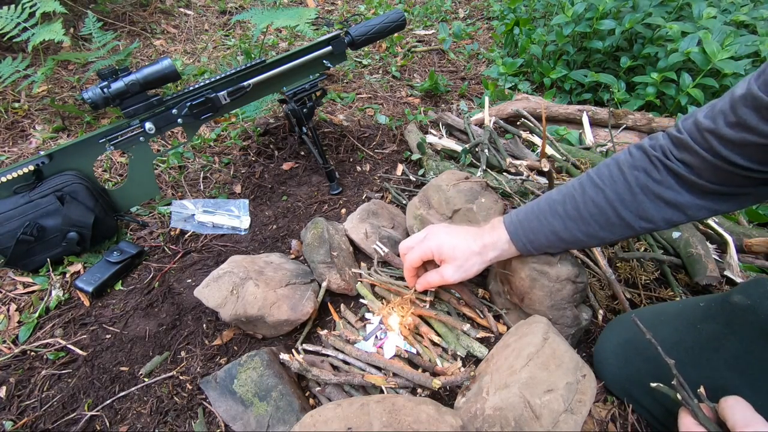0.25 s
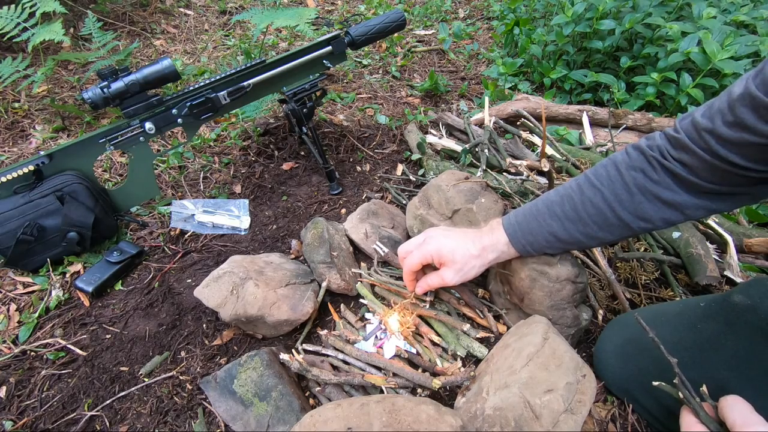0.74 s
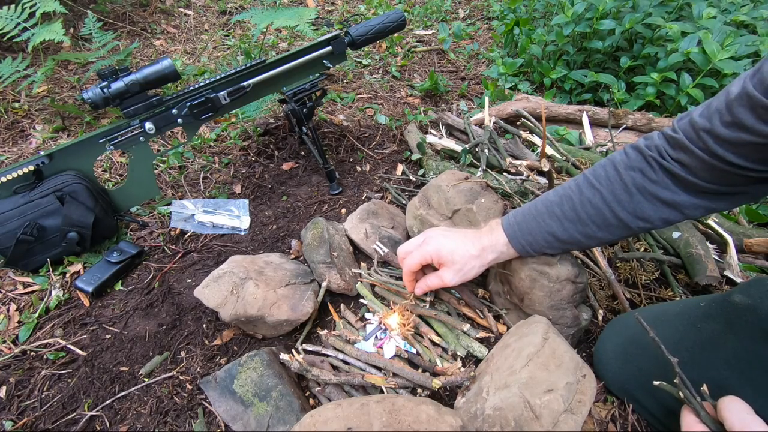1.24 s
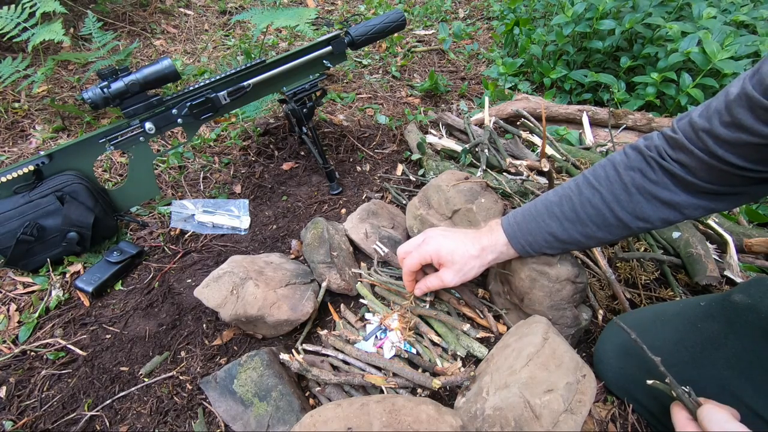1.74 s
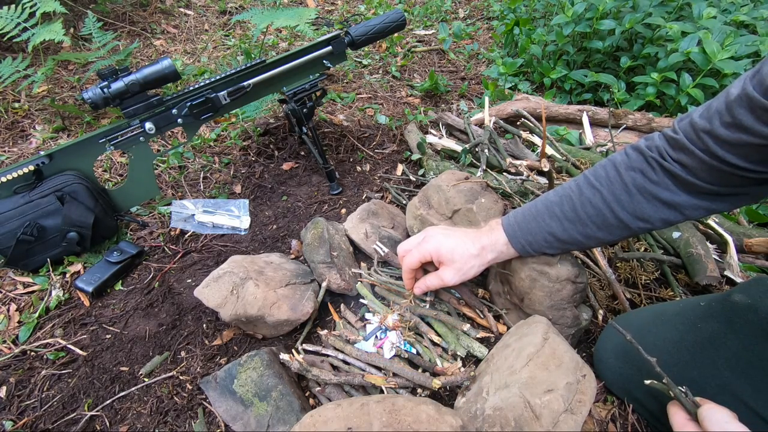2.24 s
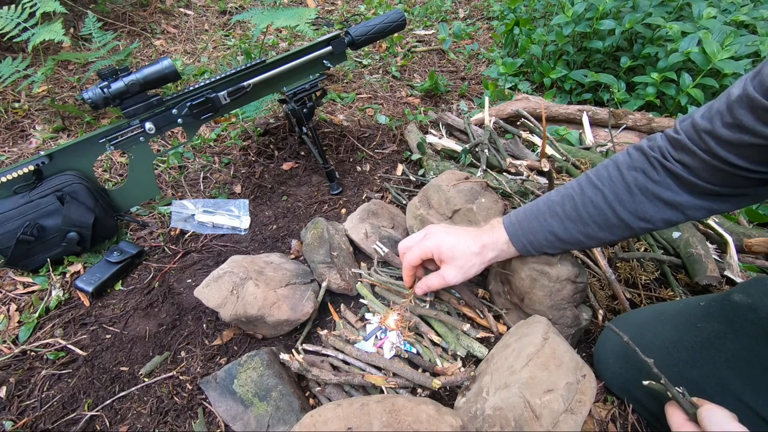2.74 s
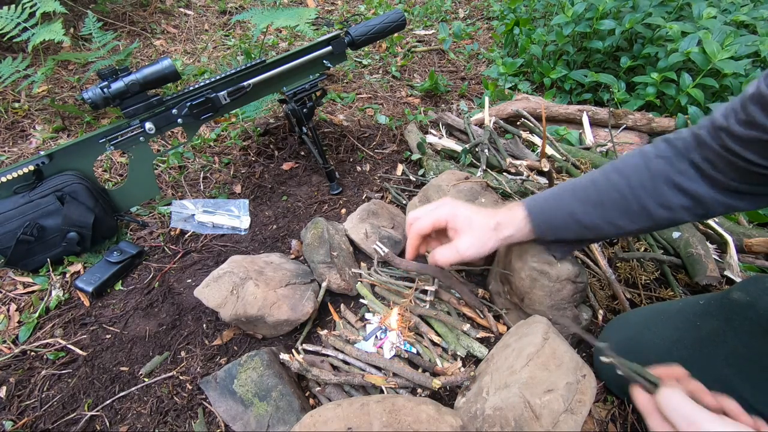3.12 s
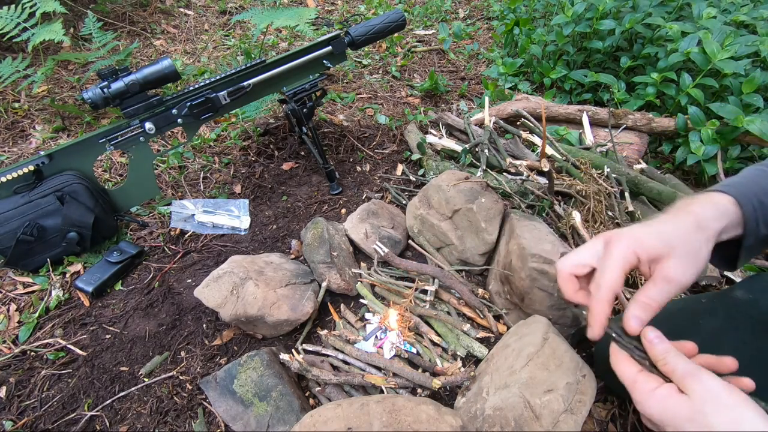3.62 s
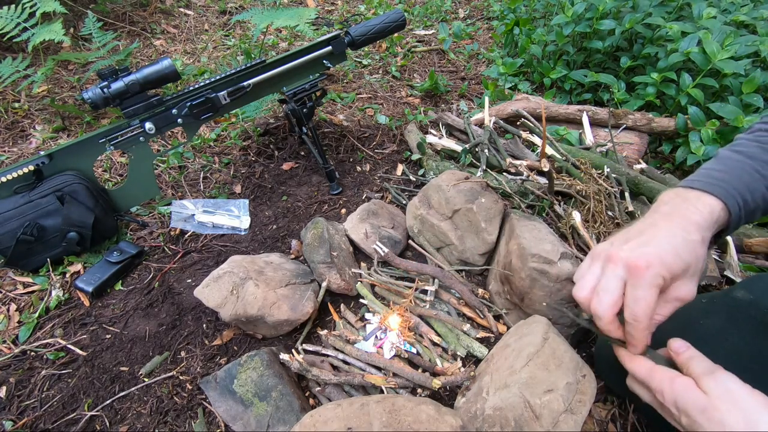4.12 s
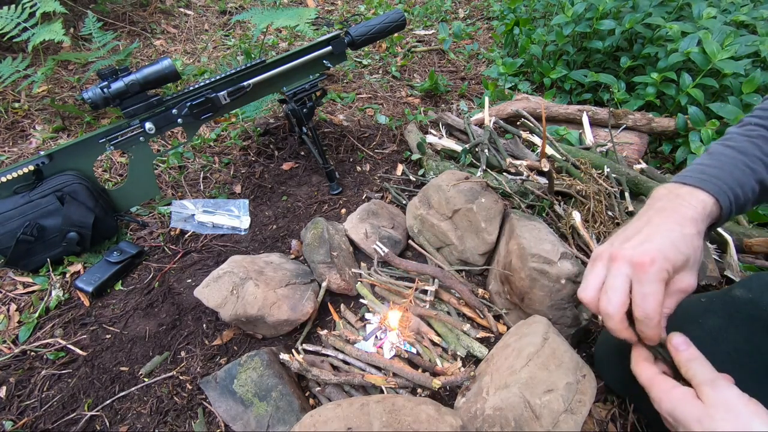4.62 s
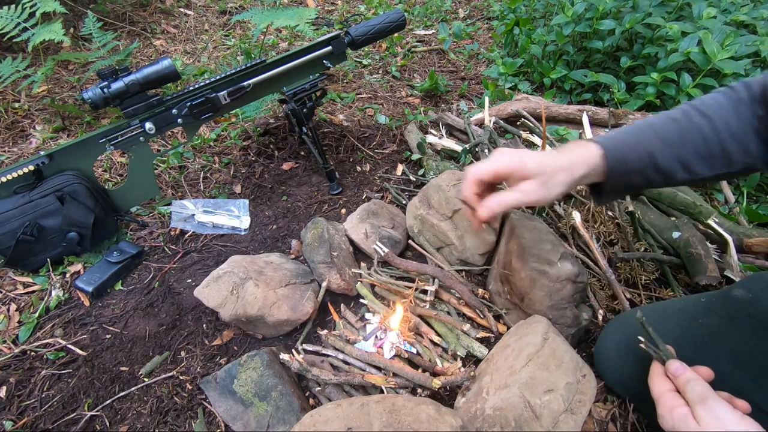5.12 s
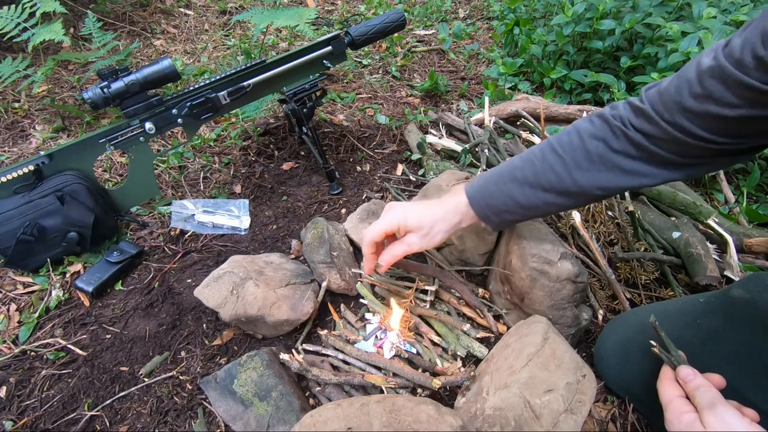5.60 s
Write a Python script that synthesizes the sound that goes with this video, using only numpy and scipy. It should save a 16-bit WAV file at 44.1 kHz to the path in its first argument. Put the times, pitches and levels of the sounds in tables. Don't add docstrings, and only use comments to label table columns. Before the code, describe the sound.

Beside a little stone-ringed camp fire, sharp dry snaps with short woody thumps stand out over very quiet woodland air, ending just after two seconds. Then hands lightly rustle and tick through twigs while wood settles and wind pushes low against the close, almost mono microphone. Soft flame flutters continue, and distant birds give thin whistles and rising buzzy calls, echoing through the trees.

```python
import sys
import numpy as np
from scipy import signal
from scipy.fft import rfft, irfft
from scipy.io import wavfile
from scipy.ndimage import uniform_filter1d

SR = 44100
rng = np.random.default_rng(int(sys.argv[2]) if len(sys.argv) > 2 else 0)


def master(y):
    cut = np.clip(np.atleast_2d(y).T, -1, 1)
    pcm = np.round(cut * 32767)
    wavfile.write(sys.argv[1], SR, pcm.astype(np.int16))


def to_linear_factor(level_db):
    exponent = np.asarray(level_db, float) / 20
    return 10 ** exponent


N = 258426


def level(x, db):
    return x * to_linear_factor(db) / np.sqrt(np.mean(x ** 2))


def band(x, hz, width_hz):
    edges_hz = [max(hz - width_hz / 2, hz / 4), min(hz + width_hz / 2, 0.45 * SR)]
    return signal.sosfilt(signal.butter(1, edges_hz, "bandpass", fs=SR, output="sos"), x)


def add(out, start_s, x):
    i = int(start_s * SR)
    out[i:i + len(x)] += x[:N - i]


def fade(t, t60_s):
    return (t >= 0) * np.exp(-np.log(1000) * np.maximum(t, 0) / t60_s)


def walk(rate_hz):
    hold = int(SR / rate_hz)
    steps = np.repeat(rng.standard_normal(N // hold + 1), hold)
    return 1.7 * uniform_filter1d(uniform_filter1d(steps, hold), hold)[:N]


def coloured(points):
    hz_all = np.fft.rfftfreq(N, 1 / SR)
    hz, db = np.transpose(points)
    gain = to_linear_factor(np.interp(np.log(hz_all + 1), np.log(hz), db))
    return rfft(rng.standard_normal(N)) * gain * (hz_all < 15800)


def swells(rows):
    t = np.arange(N) / SR
    return sum(height * np.exp(-((t - s) / half_s) ** 2) for s, half_s, height in rows)


# (frequency [Hz], density [dB per Hz])
HUSH_SPECTRUM = [(12, -20.5), (22, 3), (38, 2), (200, -0.5), (450, -7.5), (650, -9), (980, -4.5),
                 (1700, -10.5), (3300, -9), (4000, -14), (5000, -17), (6300, -21), (8000, -23),
                 (15600, -25.5)]
# (middle [s], half length [s], swell [dB])
CHORUS_BOUTS = [
    (1.27, .2, 3),
    (2.0, 0.31, 0.5),
    (3.74, 0.22, 3),
    (4.41, .2, -1),
    (5.1, 0.11, 2.5),
    (5.86, 0.13, 1.5),
]


def hush():
    hz_all = np.fft.rfftfreq(N, 1 / SR)
    air = coloured(HUSH_SPECTRUM)
    swell_db = swells(CHORUS_BOUTS) - 0.8
    out = np.zeros(N)
    for octave in np.arange(4, 14.6, 0.5):
        share = np.cos(np.pi * np.clip(np.log2(hz_all + 1) - octave, -0.5, 0.5)) ** 2
        song = np.exp(-((octave - 11.6) / 0.78) ** 2)
        drift_db = (0.3 + 1.2 * song) * walk(9)
        out += irfft(air * share, N) * to_linear_factor(song * swell_db + drift_db)
    return level(out, -66)


# (frequency [Hz], density [dB per Hz])
SIDE_SPECTRUM = [(18, -37), (30, -0.5), (548, -4.5), (832, -7), (1440, -12), (2140, -9.5), (6240, -10),
                 (15600, -8.5)]


def side_trace(snap):
    hiss = level(irfft(coloured(SIDE_SPECTRUM), N), -86)
    crack_trace = to_linear_factor(-20) * band(snap, 11000, 4990) + to_linear_factor(-34) * band(snap, 1200, 700)
    return hiss + np.roll(crack_trace, 9)


# (middle [s], half length [s], level [dB])
GUSTS = [
    (0.886, 0.47, -55),
    (1.35, 0.092, -56.5),
    (1.968, 0.3, -54.5),
    (2.748, .45, -47.5),
    (3.673, 0.081, -44),
    (4.053, 0.066, -50),
    (4.588, 0.072, -51),
    (4.93, 0.12, -47.5),
    (5.38, 0.31, -58),
]


def wind():
    low = signal.butter(3, 5.93, fs=SR, output="sos")
    pressure = level(signal.sosfilt(low, rng.standard_normal(N)), 0)
    lull_db = -68.5
    return pressure * (to_linear_factor(lull_db) + swells([(s, half_s, to_linear_factor(db)) for s, half_s, db in GUSTS]))


# (start [s], climb [s], start pitch [Hz], top pitch [Hz], level [dB])
RISING_CALLS = [
    (.96, 0.14, 5370, 6330, -70),
    (1.975, 0.16, 5570, 6590, -75),
    (2.19, 0.052, 6130, 6660, -72.5),
    (2.30, .045, 5730, 6600, -74),
    (2.866, 0.16, 5350, 6260, -68.5),
    (5.019, .16, 5325, 6420, -69),
    (5.385, 0.026, 6100, 6450, -85),
]
# (start [s], end [s], start pitch [Hz], end pitch [Hz], level [dB])
FAR_WHISTLES = [(0.094, 0.245, 2260, 2180, -78), (.27, 0.503, 5460, 5190, -88),
                (0.538, .6, 4950, 4880, -78), (.6, 0.753, 3866, 3820, -71), (1.067, 1.221, 4630, 4900, -76),
                (1.069, 1.16, 2680, 2700, -72), (1.198, 1.414, 3260, 3130, -74.5),
                (1.298, 1.528, 2270, 2203, -68.5), (1.24, 1.32, 5700, 5720, -82),
                (1.8, 2.04, 2710, 2650, -71), (2.029, 2.143, 2365, 2490, -74.5),
                (1.948, 2.154, 4200, 4740, -79.5), (2.338, 2.572, 3960, 4010, -79.5),
                (2.99, 3.203, 4790, 4790, -81), (4.093, 4.468, 3930, 2880, -70),
                (4.8, 4.97, 4215, 4020, -76), (5.22, 5.345, 4790, 4870, -81),
                (5.56, 5.656, 4750, 4960, -77), (5.74, 5.798, 5480, 5300, -79)]


def birds():
    out, t = np.zeros(N), np.arange(N) / SR
    buzz_hz, buzz_swing_hz, buzz_depth = 116, 90, 0.6
    open_s, sink_s, held_over_climb, held_db = 0.016, 0.028, 1.4, -14.5
    buzz = np.sin(2 * np.pi * np.cumsum(buzz_hz * (1 + 0.076 * walk(30))) / SR)
    grain = to_linear_factor(2.5 * walk(90))
    for start_s, climb_s, hz0, hz1, call_db in RISING_CALLS:
        knots_s = start_s + np.cumsum([0, open_s, climb_s, sink_s, held_over_climb * climb_s])
        knots_hz = [hz0, hz0, hz1, hz1, hz1]
        knots_db = call_db + np.array([-8, 0, -1.5, held_db, held_db + 5.5])
        rough = np.clip((t - knots_s[0]) / 0.1, 0, 1)
        pitch_hz = np.interp(t, knots_s, knots_hz) + rough * (buzz_swing_hz * buzz + 45 * walk(150))
        loudness = to_linear_factor(np.interp(t, knots_s, knots_db, left=-200, right=-200))
        out += loudness * (1 + buzz_depth * rough * buzz) * np.sin(2 * np.pi * np.cumsum(pitch_hz) / SR)
    waver = walk(130)
    for start_s, end_s, hz0, hz1, db in FAR_WHISTLES:
        u = np.linspace(0, 1, int((end_s - start_s) * SR))
        flutter_hz = (22 + 0.12 * abs(hz1 - hz0)) * waver[int(start_s * SR):][:len(u)]
        pitch_hz = hz0 + (hz1 - hz0) * u + flutter_hz
        whistle = np.sin(2 * np.pi * np.cumsum(pitch_hz) / SR)
        add(out, start_s, to_linear_factor(db) * np.sin(np.pi * u) ** 0.5 * whistle)
    return out * grain


def trees(x):
    t = np.arange(SR) / SR
    tail = rng.standard_normal(SR) * fade(t, 0.5) * np.clip((t - 0.012) / 0.03, 0, 1)
    return signal.fftconvolve(x, tail / np.sqrt(np.sum(tail ** 2)))[:N]


# (time [s], peak [dB])
AIR_PUFFS = [(0.21, -57.5), (0.3274, -56.5), (0.5887, -53.5), (0.7184, -58.5), (0.8447, -49.5),
             (0.9815, -54.5), (1.1118, -57), (1.241, -58.5), (1.375, -52.5), (1.5123, -54.5),
             (1.649, -55), (1.735, -43), (1.818, -50.5), (1.975, -53), (2.3606, -50.5), (3.2313, -57.5),
             (3.581, -57), (3.7146, -60), (4.33, -57), (4.4785, -58.5), (4.6354, -57), (4.775, -52),
             (4.9048, -61), (5.032, -57), (5.0859, -53), (5.158, -58.5), (5.287, -58), (5.43, -52.5),
             (5.5952, -52.5), (5.7303, -58)]
# (time [s], level [dB], pitch [Hz], t60 [s])
WOOD_THUDS = [
    (1.73, -60, 250, 0.0093),
    (1.7322, -42.5, 916, 0.0053),
    (1.799, -44, 326, 0.04),
    (2.191, -58, 330, .02),
    (2.331, -55, 260, 0.076),
    (4.59, -46.5, 284, 0.013),
    (5.083, -51.5, 230, 0.018),
]


def fire():
    out, t = np.zeros(N), np.arange(-256, 1792) / SR
    puff_s, puff_hz = 0.00058, 230
    push = np.exp(-0.5 * (t / puff_s) ** 2)
    push -= 0.084 * fade(np.abs(t), 0.026) * (1 - np.cos(2 * np.pi * puff_hz * t))
    for s, db in AIR_PUFFS:
        add(out, s + t[0], to_linear_factor(db + 3.5) * push)
    for s, db, hz, t60_s in WOOD_THUDS:
        add(out, s + t[0], -to_linear_factor(db) * 0.8 * fade(t, t60_s) * np.sin(2 * np.pi * hz * t))
    return out


# (time [s], length [ms], level [dB], centre [Hz])
TWIG_RUSTLES = [(.215, 2.2, -67, 5050), (1.022, 21, -68, 9050), (1.758, 7.5, -70, 5000),
                (3.28, 85, -78, 10760), (3.629, 3.1, -64.5, 4000), (3.701, 3.3, -66, 3840),
                (3.710, 12, -71.5, 5970), (3.731, 4, -73, 9000), (3.7412, 0.93, -55, 12000),
                (3.743, 4.1, -57, 5960), (3.898, 5, -64, 5900), (3.904, 3.6, -67, 10000),
                (3.927, 3, -66, 4440), (3.965, 4.4, -69.5, 11100), (4.588, 3.6, -61.5, 1700),
                (4.632, 25, -80, 11800), (4.769, 2.3, -63, 4480), (5.13, 38, -80, 11100),
                (5.277, 53, -71.5, 12100), (5.571, 2.4, -62, 7300), (5.641, 9.4, -69.5, 7800),
                (5.76, 43, -74.5, 10000)]


def rustles():
    out = np.zeros(N)
    chance = rng.standard_normal((len(TWIG_RUSTLES), 2, 8192))
    for (s, length_ms, db, hz), (noise, lumps) in zip(TWIG_RUSTLES, chance):
        u = np.arange(8192) / SR / (length_ms / 1000)
        lumps_db = 3 * uniform_filter1d(lumps, size=30) * np.sqrt(30)
        grit = band(noise * to_linear_factor(lumps_db), hz, min(0.8 * hz, 8040))
        add(out, s, level(grit, db) * np.clip(u / 0.2, 0, 1) * np.exp(-u ** 3))
    return out


# (time [s], ring [dB], ring pitch [Hz], ring length [ms], splinter [dB])
STICK_CRACKS = [
    (0.3433, -14, 5360, 0.38, -19),
    (0.8295, -4, 4730, 0.51, -2.5),
    (1.0392, -19, 3840, 0.66, -38.5),
    (1.33000, -42.5, 4000, .4, -39),
    (1.7884, -12.5, 4100, 0.66, -17.5),
    (2.1778, -11.5, 4180, 0.66, -27.5),
]
# (thump [dB], thump pitch [Hz], knock [dB], snap near 2 kHz [dB], wash [dB])
STICK_BODIES = [
    (-33.5, 266, -31.5, -26.5, -29.5),
    (-31.5, 420, -34, -18, -20.5),
    (-35, 422, -36.5, -29.5, -27),
    (-57, 340, -73, -58, -58.5),
    (-34.5, 470, -39.5, -28, -23.5),
    (-27, 306, -27, -27, -21.5),
]
# (delay [ms], level [dB])
STONE_BOUNCES = [
    (1.0, -21),
    (2.4, -13.5),
]


def cracks():
    out, t = np.zeros(N), np.arange(2048) / SR
    chance = rng.standard_normal((len(STICK_CRACKS), 2, 2048))

    def sine(hz, delay_s=0, phase=0):
        return np.sin(2 * np.pi * hz * (t - delay_s) + phase)

    for crack, body, (burst, leaves) in zip(STICK_CRACKS, STICK_BODIES, chance):
        s, ring_db, ring_hz, ring_ms, splinter_db = crack
        thump_db, thump_hz, knock_db, snap_db, wash_db = body
        u = t / (ring_ms / 1000)
        ring = -to_linear_factor(ring_db) * np.tanh(0.5 * u / ring_ms ** 2) * np.exp(-u ** 3) * sine(ring_hz)
        splinter = band(band(burst * np.exp(-t / 0.00014), 10200, 6000), 9800, 6500)
        splinter *= to_linear_factor(splinter_db)
        splinter += 0.59 * np.roll(splinter, int(0.00028 * SR))
        direct = ring + splinter
        sharp = direct.copy()
        dull = band(direct, 3200, 6000)
        for delay_ms, db in STONE_BOUNCES:
            lag = int(delay_ms * SR / 1000)
            sharp[lag:] += to_linear_factor(db) * dull[:-lag]
        bright = band(band(leaves, 10000, 7000), 10000, 7000)
        wash = band(leaves, ring_hz, 4055) + to_linear_factor(splinter_db - ring_db) * bright
        wash *= to_linear_factor(wash_db) * fade(t, 0.013) * np.tanh(u)
        late_s = 0.0008
        thump = -to_linear_factor(thump_db) * fade(t - late_s, 0.013) * sine(thump_hz, late_s)
        knock = -to_linear_factor(knock_db) * fade(t, 0.011) * sine(2.3 * thump_hz, phase=1.9) * np.tanh(t / 0.0001)
        snap = to_linear_factor(snap_db) * fade(t - 0.0003, 0.0058) * sine(2100, 0.0003)
        snap -= to_linear_factor(snap_db - 1) * fade(t, 0.0036) * sine(1150)
        add(out, s, sharp + wash + 1.54 * (thump + knock) + snap)
    return signal.sosfilt(signal.butter(2, 140, "highpass", fs=SR, output="sos"), out)


def scene():
    snap, song = cracks(), birds()
    direct_db, echo_song_db, echo_crack_db = -3, -2, -47
    echo = trees(song * to_linear_factor(echo_song_db) + band(snap, 4200, 5600) * to_linear_factor(echo_crack_db))
    mid = hush() + wind() + song * to_linear_factor(direct_db) + echo + fire() + rustles() + snap
    side = side_trace(snap)
    return np.array([mid + side, mid - side])


def low_pass(x):
    return signal.sosfilt(signal.butter(12, 17130, fs=SR, output="sos"), x)


def record(dry):
    top = signal.ellip(8, 0.1, 70, 16400, fs=SR, output="sos")
    mix = signal.sosfilt(top, dry)
    return low_pass(mix)


dry = scene()
out = record(dry)
master(out)
```